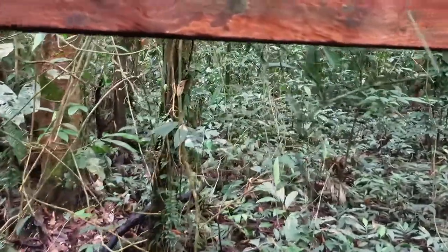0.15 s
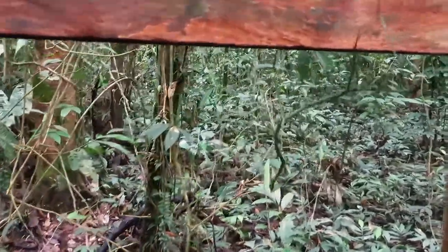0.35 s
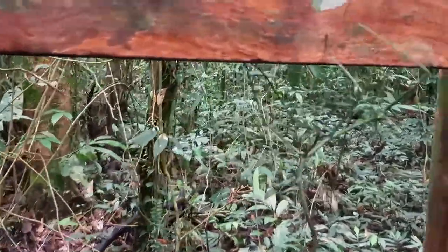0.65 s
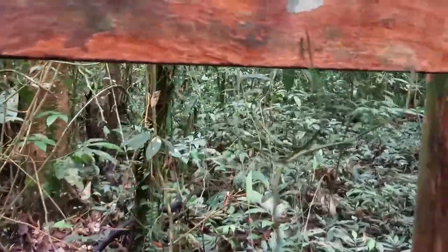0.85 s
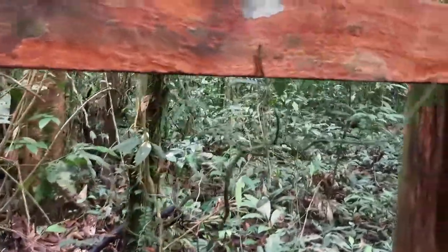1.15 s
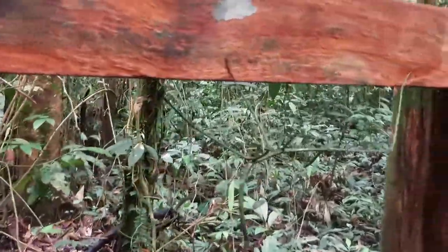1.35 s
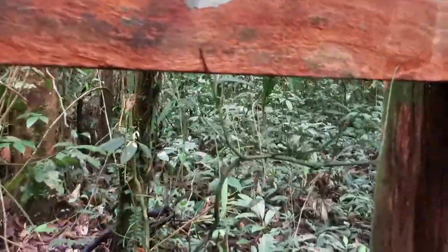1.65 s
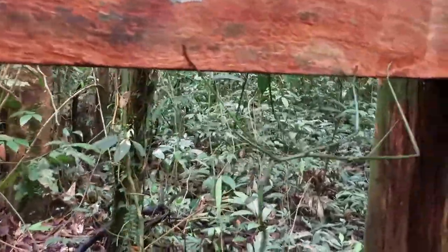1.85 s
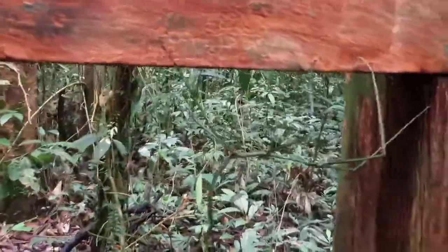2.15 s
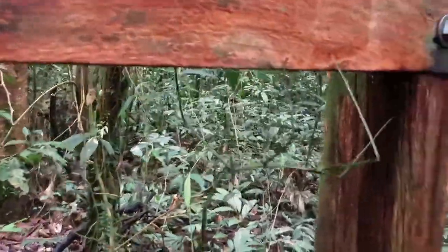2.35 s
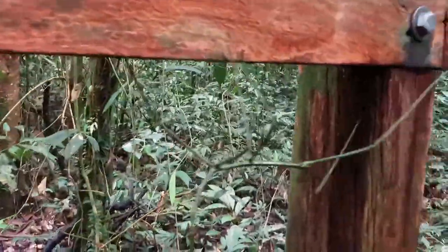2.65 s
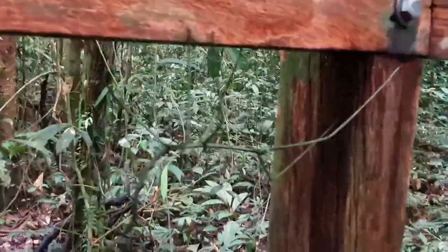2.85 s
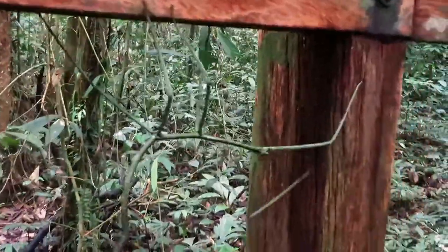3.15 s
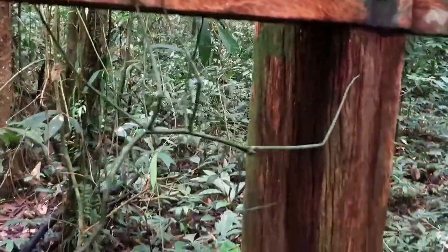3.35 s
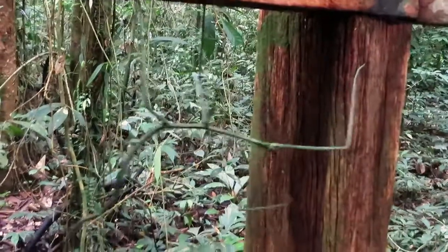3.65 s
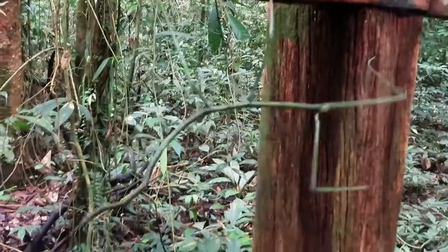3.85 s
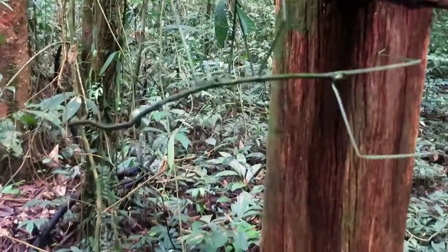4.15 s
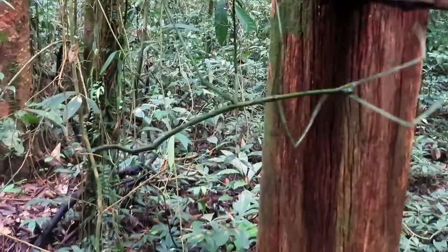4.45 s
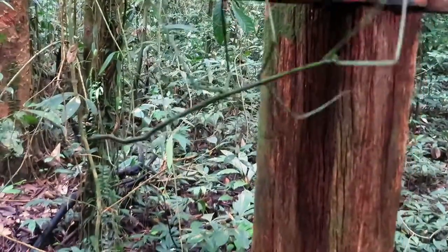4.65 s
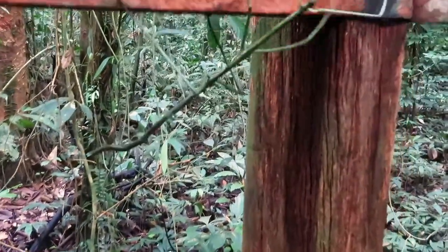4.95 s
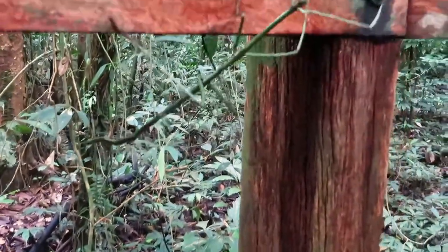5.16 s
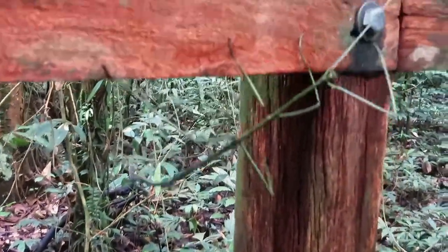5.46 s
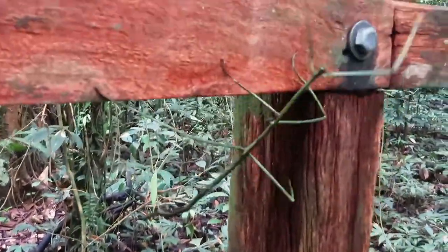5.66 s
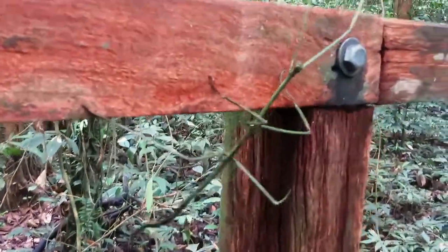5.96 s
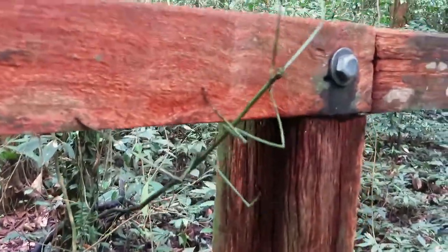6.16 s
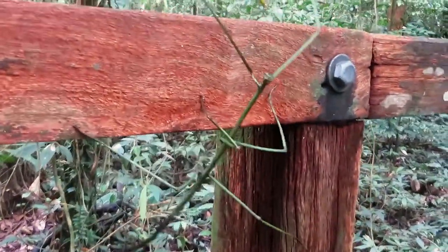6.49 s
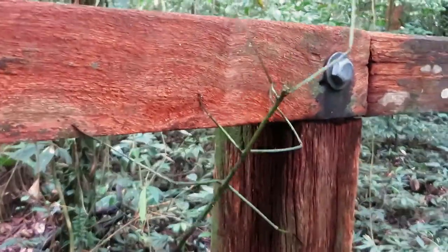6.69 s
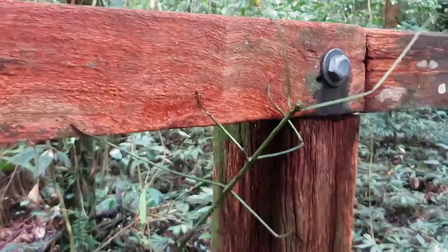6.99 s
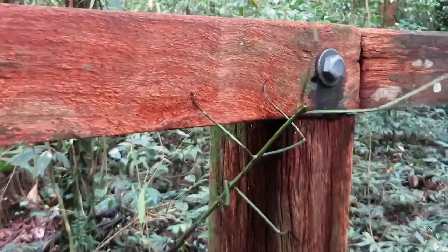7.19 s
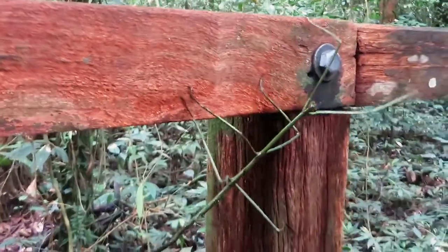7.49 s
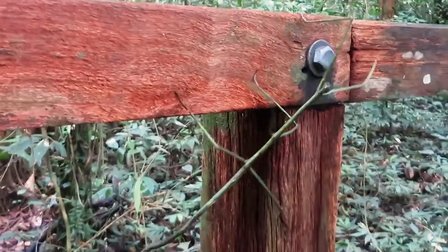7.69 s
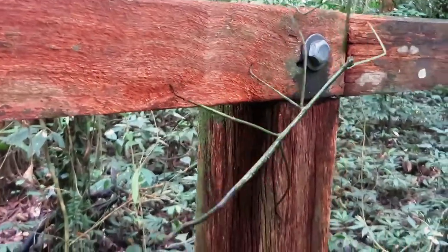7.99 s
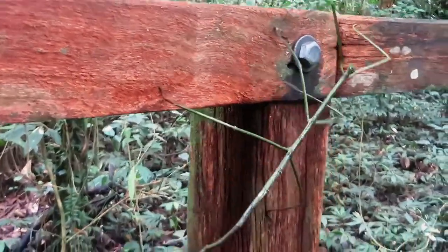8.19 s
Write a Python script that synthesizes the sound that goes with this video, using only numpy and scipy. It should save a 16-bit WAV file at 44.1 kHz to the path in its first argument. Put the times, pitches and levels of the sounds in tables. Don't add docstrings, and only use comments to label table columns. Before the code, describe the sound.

In a humid tropical forest, a fairly near cicada holds a nasal whine around 2 kHz, swelling and breaking into quick upward stutters over a wide far chorus. A cricket trills in half-second phrases about once a second, very high thin tones hang above, and soft frog pips dot the background. A bird calls once near six seconds. Fingers knock and tick on the hand-held camera, sharpest at 6.7 seconds.

```python
import sys
import numpy as np
from scipy import signal
from scipy.fft import rfft, irfft, next_fast_len
from scipy.io import wavfile
from scipy.ndimage import uniform_filter1d, map_coordinates

SR = 44100
rng = np.random.default_rng(int(sys.argv[2]) if len(sys.argv) > 2 else 0)


def invert_db(x):
    u = np.asarray(x, float) / 20
    return 10 ** u


def to_wav(s):
    ch = np.atleast_2d(s).T
    pcm = np.round(np.clip(ch, -1, 1) * 32767)
    wavfile.write(sys.argv[1], SR, pcm.astype(np.int16))


N = 367353
T = np.arange(N) / SR

# frequency in Hz, density in dB per Hz.
AIR_COLOUR = [(8.8, -39), (15, -11.5), (96, 1.5), (350, -2.5), (552, -5.5), (839, -3), (1140, -6),
              (1250, -5.5), (1400, -4), (1820, -11), (3080, -120)]
AIR_SIDE_COLOUR = [(8.8, -59), (15, -29), (32, -25), (120, -3), (189, 0), (409, -1.5), (1290, -13.5),
                   (1450, -14.5), (1700, -10.5), (2210, -37), (3740, -120)]
FIZZ_COLOUR = [(8500, -40), (9100, -12), (10900, -11), (11150, -19), (11300, 0), (12000, 0), (12080, -11),
               (12420, -14), (13200, -13), (13800, -40)]

# frequency in Hz, density in dB per Hz.
LOW_CICADAS = [(740, -36), (1250, -25.5), (1630, -5.5), (1960, -5), (2100, -1.5), (2220, -2.5), (2320, -13),
               (2470, -18), (2600, -23), (3380, -43), (5720, -120)]
MID_CICADAS = [(1470, -21.5), (2500, 0), (2560, -4.5), (3080, 0.5), (4520, -7), (4920, -11), (5040, -4.5),
               (5460, -12), (5750, -16), (7480, -15), (12700, -120)]
FAR_CRICKETS = [(3350, -39), (5700, -14), (6030, -2.5), (6350, 6.5), (6740, -7.5), (6970, -49), (7400, -14),
                (9620, -103), (16300, -120)]
FAR_KATYDIDS = [(4290, -40), (7300, -14), (8010, 7.5), (8400, 9.5), (8870, -5.5), (9300, -69), (12100, -43),
                (20500, -120)]
CHORUS_DB = [
    -37,
    -41.5,
    -41,
    -44.5,
]
# time in seconds, gain in dB.
CHORUS_SWELL = [(0, 0), (2.1, -1.5), (2.7, 0), (5.5, .5), (7, 1), (8.33, -1.5)]
# start in seconds, length in seconds, gain in dB over their murmur.
FAR_PHRASES = [(0, 0.37, 4.5), (.65, 0.57, 3), (1.4, 0.74, 3), (2.5, 0.6, 3), (3.35, 0.98, 2.5),
               (4.55, 0.93, 3), (5.9, 0.91, 1.5), (7.248, 0.55, 5.5), (8.2, .3, 1)]

# time in seconds, level in dB.
BUSH_LEVEL = [(0, -55), (1.6, -57.5), (2.4, -56), (3.3, -53.5), (3.8, -54.5), (4.5, -53), (5.4, -57.5),
              (6.4, -52), (8.33, -51)]

# pitch in Hz, swing in Hz, period in seconds, time of top in seconds.
TREE_PITCH = [
    (11510, 22, 5, .97),
    (11640, 25, 4.4, .25),
    (11922, 24, 3.15, .74),
]
# level in dB, sideband of its flutter in dB.
TREE_FLUTTER = [
    (-49, -9),
    (-42.5, -23),
    (-49.5, -29),
]
# time in seconds, level in dB.
PORT_AGREEMENT = [(0.0, -53), (0.35, -44), (0.44, -53), (1.48, -47), (1.72, -52.5), (1.92, -43),
                  (2.06, -58), (2.34, -42), (2.6, -52.5), (2.69, -47), (4.13, -56), (4.27, -45.5),
                  (5.38, -51), (6.98, -46.5), (7.07, -62), (7.33, -47), (7.98, -56), (8.33, -49)]

# start in seconds, peak in dB, pitch in Hz.
FROG_PIPS = [(0.509, -48, 824), (0.596, -47, 815), (0.761, -44, 834), (1.039, -49, 883), (1.128, -51, 805),
             (1.931, -49, 818), (2.017, -47, 791), (2.049, -44.5, 853), (2.28, -47, 860),
             (2.939, -44.5, 880), (3.218, -48, 824), (3.31, -48, 810), (4.293, -50, 942),
             (4.489, -46.5, 842), (4.66, -49, 830), (5.02, -52, 830), (5.334, -46, 876), (6.301, -48, 906),
             (7.816, -51, 1024)]
# time in seconds, pitch in Hz, level in dB.
BIRD_NOTES = [
    [(5.76, 3200, -55), (5.8, 3910, -49), (5.9, 3970, -51), (5.96, 3050, -47), (5.98, 3000, -55)],
    [(6, 3930, -50), (6.06, 4220, -40), (6.105, 4206, -37.5), (6.125, 3810, -36), (6.19, 3080, -39.5),
     (6.21, 2930, -61)],
]

# start in seconds, length in seconds, level in dB.
TRILL_PHRASES = [(.18, 0.53, -42), (1.353, 0.52, -36.5), (2.443, 0.52, -38.5), (3.875, 0.49, -37.5),
                 (4.94, 0.59, -39.5), (6.312, .517, -42.5), (7.267, 0.51, -41.5), (8.24, .54, -41)]

# start in seconds, peak in dB, mode in Hz, 60 dB decay in seconds.
BODY_KNOCKS = [(1.415, -32, 160, 0.031), (2.277, -37.5, 378, 0.044), (2.893, -31.5, 290, 0.055),
               (3.045, -31, 810, 0.04), (5.099, -31.5, 161, 0.034), (5.192, -36, 996, 0.06),
               (5.667, -39, 1030, 0.064), (6.048, -32.5, 242, 0.08), (6.653, -30.5, 1090, 0.053),
               (6.817, -33, 1190, 0.035), (7.224, -32, 295, 0.037), (7.572, -35, 1000, 0.046)]
# start in seconds, peak in dB, centre in Hz, width in Hz, 60 dB decay
# in seconds.
NAIL_TICKS = [(1.97, -34, 9800, 1500, .004), (2.9946, -22, 9500, 4000, 0.0033),
              (3.8836, -26, 9800, 3500, 0.0051), (6.6685, -13, 5400, 2200, 0.008),
              (6.6642, -10.5, 5100, 1900, 0.014), (6.664, -19.5, 2800, 700, 0.029),
              (6.6935, -14.5, 4950, 1800, 0.017), (6.724, -22, 5200, 1500, .01),
              (6.1, -27, 10000, 3500, .008), (6.8204, -21, 10100, 3000, .005),
              (7.2305, -28, 9800, 4000, 0.0044), (7.22, -20, 2800, 1500, .01),
              (7.229, -26, 750, 1060, 0.041), (1.418, -29.5, 630, 1000, 0.017),
              (3.052, -16.5, 2000, 2020, 0.013), (7.572, -33, 9400, 1500, .005)]

# time in seconds, level in dB.
DRONE_EFFORT = [(0.0, -34.5), (0.23, -45), (1.28, -35.5), (1.97, -53), (2.23, -37), (2.46, -43),
                (2.51, -29.5), (2.74, -39), (3.36, -34), (5.89, -38), (6.05, -44), (6.15, -36), (7.93, -40),
                (8.33, -54)]
# multiple, level in dB over the ninth.
UPPER_MULTIPLES = [
    (10, -3.5),
    (11, -13),
]
# centre in seconds, half length in seconds, level in dB, ninth multiple in dB.
DRONE_SURGES = [(0.757, .05, -43, -50), (1.08, 0.078, -38, -45), (2.23, .04, -39, -46),
                (2.53, 0.045, -35, -56), (3.6, 0.14, -37, -52), (4.58, 0.032, -36, -49),
                (4.875, 0.1, -31, -51), (5.606, 0.043, -29, -36), (5.52, 0.045, -52, -44),
                (5.89, 0.032, -44, -49), (6.167, .08, -36, -55), (6.34, 0.1, -41, -40.5),
                (6.55, 0.062, -31, -46), (6.688, 0.021, -29, -37), (7.0, .25, -47, -51),
                (7.853, 0.032, -39, -51)]
# start in seconds, length in seconds, from in Hz, to in Hz, level in dB.
RISING_STARTS = [
    (.833, .11, 1000, 2150, -36),
    (2.092, .06, 1250, 2150, -35),
    (2.19, .1, 1250, 2150, -34.5),
]
# first tone in seconds, last tone in seconds, number of tones, level in dB.
STUTTER_BOUTS = [(.93, 1.1, 3, -30), (1.19, 1.371, 3, -27.5), (1.45, 1.692, 4, -35), (2.53, 2.63, 2, -29),
                 (2.725, 3.302, 8, -29), (3.402, 4.07, 8, -29), (4.178, 4.399, 3, -27),
                 (4.511, 4.586, 2, -28.5), (5.147, 5.342, 2, -30), (5.757, 5.897, 3, -34.5),
                 (6.505, 7.173, 9, -32), (7.287, 7.408, 3, -33), (7.568, 7.805, 3, -30.5)]
# time in seconds, level in dB.
FADING_LEVEL = [(0, -41.5), (.5, -39), (1.05, -41), (1.25, -51), (8.33, -68)]

BODY_HZ = 2166


def unit(x):
    return x / np.sqrt(np.mean(np.abs(x) ** 2) + 1e-20)


def curves(rows):
    s, *columns = np.transpose(rows)
    return [np.interp(T, s, column) for column in columns]


def wobble(rate):
    return map_coordinates(rng.standard_normal(int(N * rate / SR) + 4), [T * rate])


def turns(hz):
    return 2 * np.pi * np.cumsum(hz) / SR


def smear(rough, rate):
    return np.sqrt(1 - rough) + np.sqrt(rough / 2) * (wobble(rate) + 1j * wobble(rate))


def rush(colour, patchy_db):
    z = signal.stft(rng.standard_normal(N + 512), nperseg=512)[2]
    patches = uniform_filter1d(rng.standard_normal(z.shape), 4, 0)
    patches = unit(uniform_filter1d(patches, 12, 1))
    x = signal.istft(z * invert_db(patchy_db * patches), nperseg=512)[1]
    hz, db = np.transpose(colour)
    m = next_fast_len(len(x))
    grid = np.fft.rfftfreq(m, 1 / SR)
    gain = invert_db(np.interp(np.log(grid + 1), np.log(hz + 1), db))
    return unit(irfft(rfft(x, m) * gain, m)[:N])


def spread(mid, side, lean_db):
    return np.array([mid + side, mid - side]) * invert_db([[lean_db / 2], [-lean_db / 2]])


def forest(x, wet_db, side_db, t60, lean_db):
    t = T[:SR // 2]
    build_up = 1 - np.exp(-t / 0.023)
    tails = rng.standard_normal((2, len(t))) * invert_db(-60 * t / t60) * build_up
    tails /= np.linalg.norm(tails[0])
    mid, side = signal.fftconvolve(x[None], tails, axes=1)[:, :N]
    mixed = (x + invert_db(wet_db) * mid) / np.sqrt(1 + invert_db(2 * wet_db))
    return spread(mixed, invert_db(side_db) * side, lean_db)


def air():
    rumble = invert_db(-49.5) * rush(AIR_COLOUR, patchy_db=1.57)
    port_noise = invert_db(-45.5) * rush(AIR_SIDE_COLOUR, patchy_db=0.8)
    fizz_mid = invert_db(-61) * rush(FIZZ_COLOUR, patchy_db=2.2)
    fizz_side = invert_db(-58) * rush(FIZZ_COLOUR, patchy_db=2.2)
    return spread(rumble, port_noise, lean_db=-0.4) + spread(fizz_mid, fizz_side, lean_db=0.5)


def chorus_band(colour, side_db, lean_db, patchy_db):
    mid = rush(colour, patchy_db)
    side = invert_db(side_db) * rush(colour, patchy_db)
    return spread(mid, side, lean_db)


def far_phrases():
    def edge(s):
        return (1 + np.tanh((T - s) / 0.13)) / 2

    return invert_db(sum((db + 2) * (edge(s) - edge(s + length)) for s, length, db in FAR_PHRASES))


def crowd():
    swell_db, = curves(CHORUS_SWELL)
    low_db, mid_db, cricket_db, katydid_db = CHORUS_DB
    low = chorus_band(LOW_CICADAS, side_db=-16.5, lean_db=-2.0, patchy_db=1.0)
    mid = chorus_band(MID_CICADAS, side_db=-9.5, lean_db=-1.3, patchy_db=0.97)
    crickets = chorus_band(FAR_CRICKETS, side_db=-4.5, lean_db=-0.6, patchy_db=1.0)
    katydids = chorus_band(FAR_KATYDIDS, side_db=-1.5, lean_db=0.7, patchy_db=0.5)
    out = invert_db(low_db + swell_db) * low
    out += invert_db(mid_db + 0.18 * swell_db) * mid
    out += invert_db(cricket_db - 3) * far_phrases() * crickets
    out += invert_db(katydid_db - 0.13 * (T - 6)) * katydids
    return out


def bush_cricket():
    chirps = unit(np.sin(turns(12 + 5 * wobble(6)) / 2) ** 2 + 0.33)
    hz = 5165 + 5.5 * T + 5 * wobble(3)
    tone = smear(rough=0.18, rate=30) * np.exp(1j * turns(hz))
    song = invert_db(curves(BUSH_LEVEL)[0] + 3.3) * chirps * tone.real
    return forest(song, wet_db=-7, side_db=-7, t60=0.3, lean_db=-0.4)


def tree_crickets():
    wing_beat_hz, in_step_db = 287, -44
    out = np.zeros((2, N))
    apart = np.arccos(np.clip(invert_db(curves(PORT_AGREEMENT)[0] - in_step_db), 0, 1))
    for (hz, swing, period, top_s), (db, side_db) in zip(TREE_PITCH, TREE_FLUTTER):
        beat = 1 + 2 * invert_db(side_db) * np.cos(turns(wing_beat_hz + 5 * wobble(1.2)))
        drift = apart + 0.25 * wobble(6)
        fade = invert_db(2.2 * np.array([wobble(6), wobble(6)]))
        pitch = hz + swing * np.cos(2 * np.pi * (T - top_s) / period) + 2.5 * wobble(25)
        out += invert_db(db) * beat * fade * np.sin(turns(pitch) + [drift, -drift])
    return out * invert_db([[0.45], [-0.45]])


def frog():
    pips = np.zeros(N)
    for s, db, hz in FROG_PIPS:
        bell = np.exp(-((T - s - 0.015) / 0.013) ** 2)
        pips += invert_db(db + 2) * bell * np.sin(2 * np.pi * hz * T)
    return forest(pips, wet_db=-6, side_db=-8, t60=0.3, lean_db=-0.9)


def bird():
    notes = np.zeros(N)
    for rows in BIRD_NOTES:
        hz, db = curves(rows)
        sounding = (T > rows[0][0]) * (T < rows[-1][0])
        voice = smear(rough=0.61, rate=220) * np.exp(1j * turns(hz))
        notes += invert_db(db + 10) * sounding * voice.real
    return forest(notes, wet_db=5, side_db=-9, t60=0.62, lean_db=-1.4)


def trill():
    stroke_s, warm_s = 0.0337, 0.07
    song = np.zeros(N + SR)
    scatter_db = 0.98 * wobble(30)
    for start, length, db in TRILL_PHRASES:
        t = T[:round(length * SR)]
        strokes = round(length / stroke_s)
        u = t / length * strokes % 1
        cold = np.exp(-t / warm_s)
        hz = 6537 - 109.7 * cold + 150 * (u - 0.5)
        level = invert_db(db + 10.5 - 2.5 * cold)
        song[round(start * SR):][:len(t)] = level * np.sin(np.pi * u) ** 3.8 * np.sin(turns(hz))
    return forest(song[:N] * invert_db(scatter_db), wet_db=-7.0, side_db=-8, t60=0.31, lean_db=-2.5)


def knocks():
    out, t = np.zeros((2, N + SR)), T[:SR // 8]
    dull = signal.butter(2, 1500 / (SR / 2), output="sos")
    for s, db, hz, t60 in BODY_KNOCKS:
        ring = np.sin(2 * np.pi * hz * t)
        ring += 0.68 * np.sin(2 * np.pi * hz * rng.uniform(0.86, 3.2) * t)
        puff = unit(signal.sosfilt(dull, rng.standard_normal((2, len(t)))))
        envelope = invert_db(db - 1.0 - 60 * t / t60) * (1 - np.exp(-t / 0.0013))
        out[:, round(s * SR):][:, :len(t)] += envelope * (0.79 * ring + 0.88 * puff)
    return out[:, :N]


def ticks():
    out, t = np.zeros((2, N + SR)), T[:SR // 8]
    for s, db, hz, width_hz, t60 in NAIL_TICKS:
        edges = np.clip([hz - width_hz / 2, hz + width_hz / 2], 100, SR / 2.2)
        resonance = signal.butter(3, edges / (SR / 2), "band", output="sos")
        noise = rng.standard_normal((3, len(t))) * invert_db(-60 * t / t60)
        snap = signal.sosfilt(resonance, noise[0] + 1.9 * noise[1:])
        out[:, round(s * SR):][:, :len(t)] += invert_db(db) * snap / np.abs(snap).max()
    return out[:, :N]


def slide(length, low_hz, top_hz, db, haste):
    t = T[:round(length * SR)]
    hz = top_hz - (top_hz - low_hz) * np.exp(-haste * t / length)
    knots = np.linspace(0, length, num=12)
    rasp = invert_db(3.5 * np.interp(t, knots, rng.standard_normal(size=12)))
    return invert_db(db + 6.0) * rasp * np.sin(np.pi * t / length) ** 0.61 * np.sin(turns(hz))


def stutter():
    windup_haste, slur_haste = 4.2, 6
    rows = [(*row, windup_haste) for row in RISING_STARTS]
    for first, last, tones, db in STUTTER_BOUTS:
        late, loud = rng.standard_normal((tones, 2)).T
        times = np.linspace(first, last, num=tones) + 0.007 * late
        levels = db - 7.5 + 1.5 * loud
        rows += [(s, 0.08, 1620, BODY_HZ, level, slur_haste) for s, level in zip(times, levels)]
    out = np.zeros(N + SR)
    for s, *shape in rows:
        tone = slide(*shape)
        out[round(s * SR):][:len(tone)] += tone
    return out[:N]


def drone():
    clear_db = -37
    effort = curves(DRONE_EFFORT)[0] - clear_db
    eighth = invert_db(clear_db + 1.37 * effort)
    ninth = invert_db(-50 + 0.69 * effort)
    for s, half, db, next_db in DRONE_SURGES:
        bell = np.exp(-((T - s) / half) ** 4)
        eighth += invert_db(db) * bell
        ninth += invert_db(next_db) * bell
    click = turns(BODY_HZ + 7 * wobble(2.5)) / 8
    song = eighth * invert_db(-3) * smear(rough=0.11, rate=40) * np.exp(8j * click)
    song += ninth * invert_db(-2.5) * smear(rough=0.31, rate=45) * np.exp(9j * click)
    for multiple, db in UPPER_MULTIPLES:
        song += ninth * invert_db(db - 6) * smear(rough=0.77, rate=60) * np.exp(1j * multiple * click)
    return np.sqrt(2) * song.real


def fading_cicada():
    pulses = 1 + 0.8 * np.cos(turns(33 + wobble(4.05)))
    tone = smear(rough=0.8, rate=170) * np.exp(1j * turns(1820 + 25 * wobble(3)))
    return np.sqrt(2) * invert_db(curves(FADING_LEVEL)[0]) * pulses * tone.real


def near_voices():
    near = forest(drone(), wet_db=-9.5, side_db=-15.5, t60=0.37, lean_db=-1.5)
    return near + forest(fading_cicada() + stutter(), wet_db=-4.0, side_db=-14.5, t60=0.38, lean_db=-2.2)


def scene():
    singers = crowd() + bush_cricket() + tree_crickets() + frog() + bird() + trill() + near_voices()
    return air() + singers + knocks() + ticks()


def top_cut(x):
    return signal.sosfilt(signal.butter(12, 13200, fs=SR, output="sos"), x)


def record(dry):
    return top_cut(dry)


dry = scene()
out = record(dry)
to_wav(out)
```